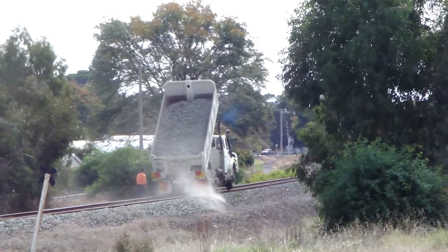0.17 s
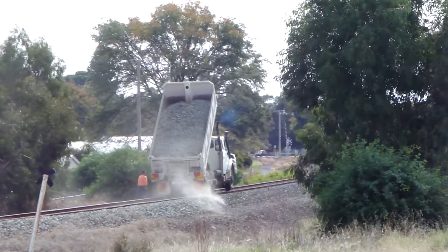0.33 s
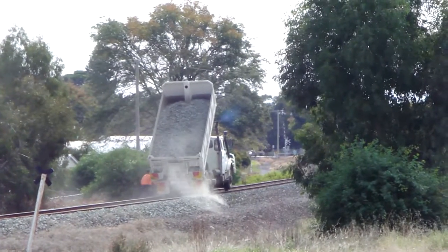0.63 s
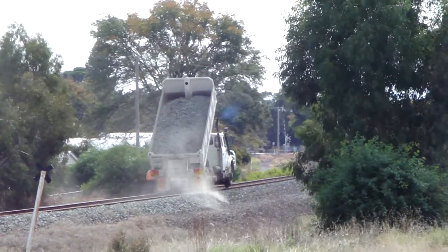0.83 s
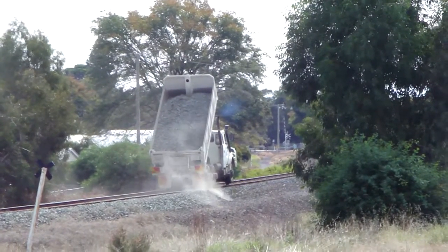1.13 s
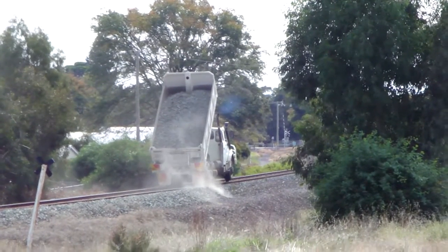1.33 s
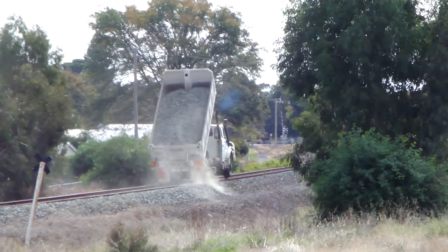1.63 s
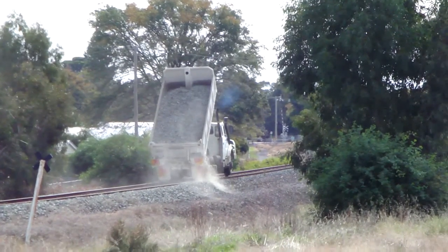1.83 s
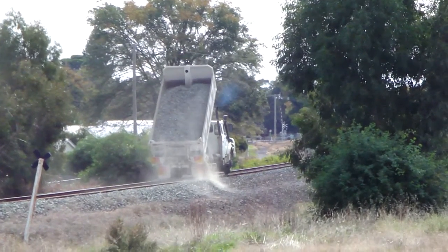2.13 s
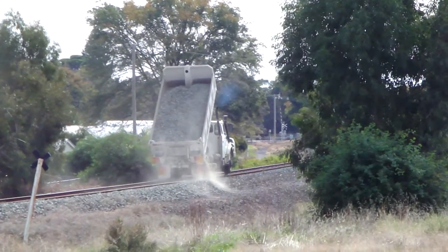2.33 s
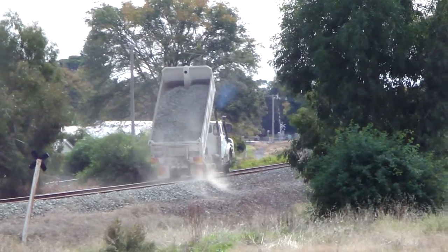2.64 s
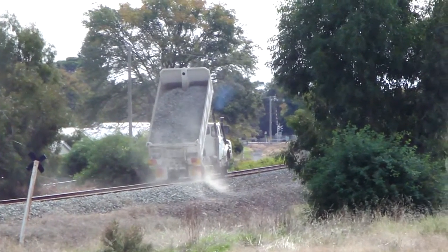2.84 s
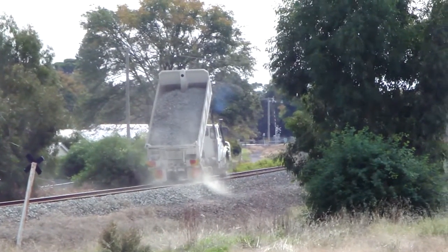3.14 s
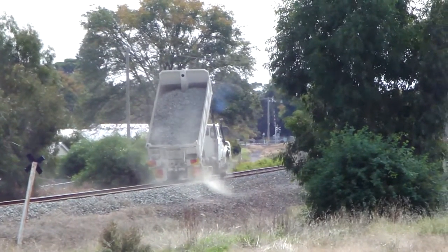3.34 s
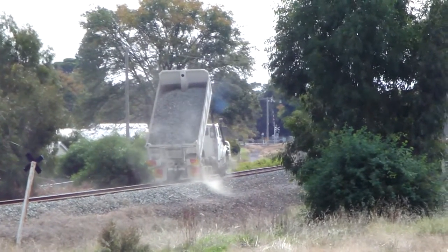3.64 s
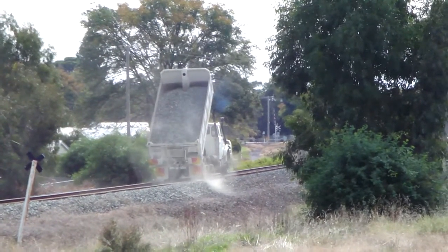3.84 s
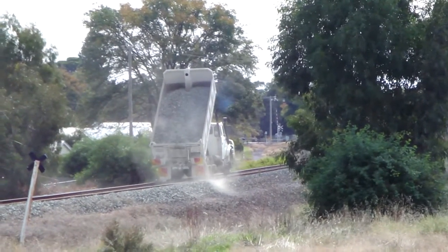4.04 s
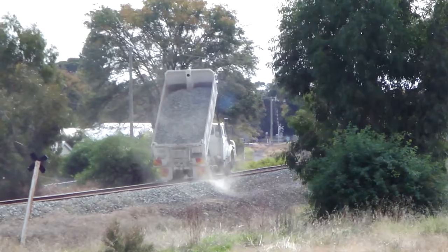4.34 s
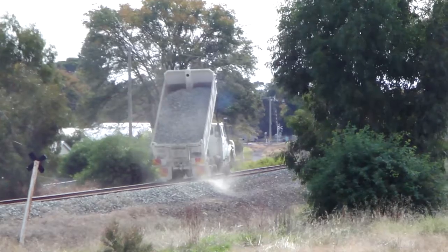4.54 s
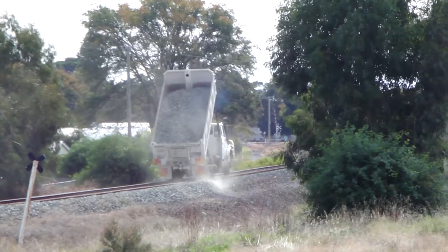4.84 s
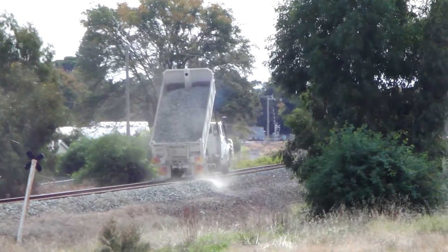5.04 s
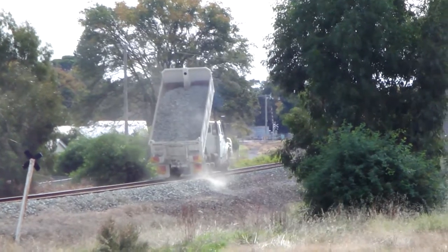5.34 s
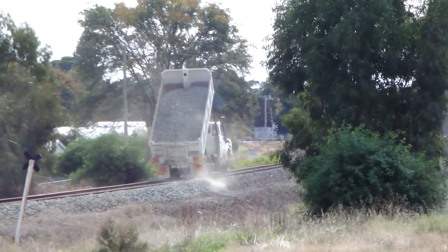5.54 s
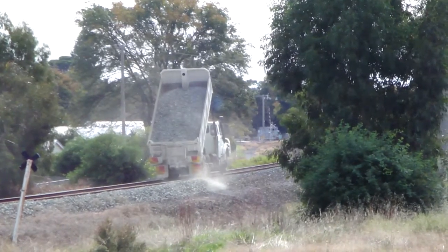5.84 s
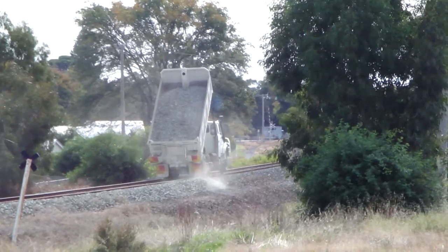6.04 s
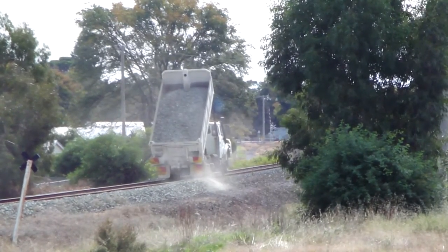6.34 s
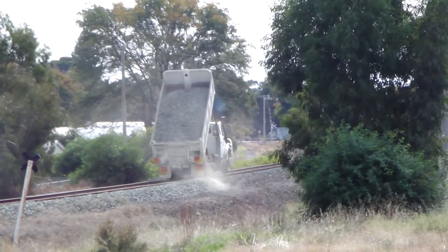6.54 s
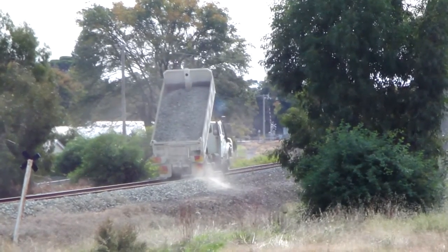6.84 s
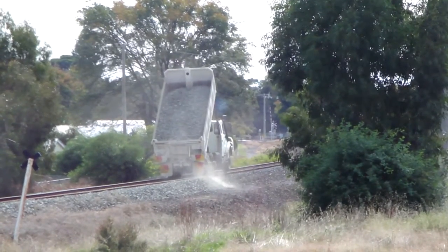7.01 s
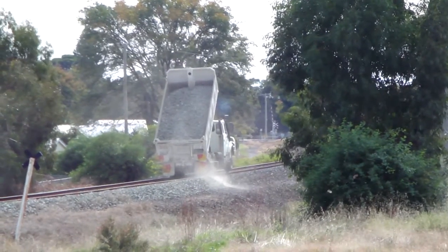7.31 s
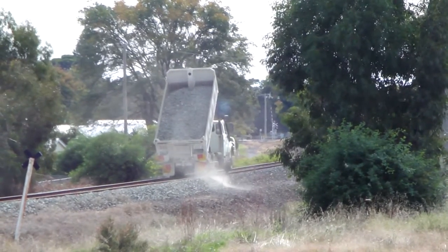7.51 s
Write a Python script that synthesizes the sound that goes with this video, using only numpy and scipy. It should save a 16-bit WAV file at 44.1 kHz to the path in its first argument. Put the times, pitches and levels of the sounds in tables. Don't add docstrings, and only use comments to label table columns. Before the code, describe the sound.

Crushed rock pours from a distant tipping truck in a rushing, clattering hiss, stones knocking, then thins to a gritty trickle over engine hum.

```python
import sys
import numpy as np
from scipy import signal
from scipy.fft import rfft, irfft, next_fast_len
from scipy.io import wavfile
from scipy.ndimage import uniform_filter1d

SR = 44100
rng = np.random.default_rng(int(sys.argv[2]) if len(sys.argv) > 2 else 0)


def generate_wav(sig):
    pcm = np.round(np.clip(np.atleast_2d(sig).T, -1, 1) * 32767).astype(np.int16)
    wavfile.write(sys.argv[1], SR, pcm)


def gain_from_db(level_db):
    decades = np.asarray(level_db, float) / 20
    return 10 ** decades


N = 338247


def evened(x):
    return x / np.sqrt(np.mean(x ** 2) + 1e-20)


def read(points, hz):
    f, value = np.transpose(points)
    return np.interp(np.log(hz + 1), np.log(f + 1), value)


def add(mix, s, sound):
    part = mix[..., round(s * SR):][..., :sound.shape[-1]]
    part += sound[..., :part.shape[-1]]


def filtered(x, response):
    size = next_fast_len(N)
    hz = np.fft.rfftfreq(size, 1 / SR)
    return irfft(rfft(x, size) * response(hz), size)[..., :N]


def left_right(pan_db):
    return np.array([[pan_db], [-pan_db]]) / 2


# time in seconds, level of the firing tone in dB, of the pump in dB, of the fan in dB.
ENGINE_TONES = [(0, -59, -50, -67), (1, -61, -60, -66), (2, -52.5, -55, -71), (3, -55.5, -62, -60),
                (4, -52.5, -60, -59), (4.7, -54.5, -67, -69), (5.3, -64, -57, -53), (6.5, -79, -49.5, -64),
                (7.67, -55, -61, -55)]


def hum():
    tones_hz, pans_db = (121.5, 453, 234), (-9, -14, -6)
    s, *levels = np.transpose(ENGINE_TONES)
    t, out = np.arange(N) / SR, np.zeros((2, N))
    for hz, pan_db, db in zip(tones_hz, pans_db, levels):
        waver = evened(uniform_filter1d(rng.standard_normal(N), size=9000))
        tone = np.sin(2 * np.pi * np.cumsum(hz * (1 + 0.0024 * waver)) / SR)
        level_db = np.interp(t, s, db) - 4 + 0.8 * waver[::-1]
        out += gain_from_db(level_db + left_right(pan_db)) * tone
    return out


# time in seconds, flow in dB, share of fine grit in dB.
STREAM_FLOW = [(0.0, -26.5, 3.5), (0.4, -26, -3.5), (0.72, -23.5, -3), (1.0, -24.5, -4.5), (1.25, -24, -3),
               (2.2, -24.5, -3), (2.5, -23.5, -2), (3.6, -22.5, -4.5), (3.8, -25.5, -3.5), (4.5, -26, -4.5),
               (5.0, -28, -2), (5.7, -30.5, -4), (6.0, -29.5, -5), (6.2, -31.5, -1.5), (6.5, -30.5, 1),
               (6.95, -30.5, -3), (7.2, -29.5, -5), (7.66, -29.5, -0.5)]
# middle in seconds, length in seconds, change of flow in dB, change of grit in dB.
CLUMPS_AND_LULLS = [(0.37, 0.065, 1, 5.5), (0.543, .15, -1.5, 4.5), (0.686, 0.067, 1, 0),
                    (0.95, 0.028, 2.5, 2), (1.047, 0.086, -0.5, 2), (1.225, 0.039, 2, -2),
                    (2.555, 0.036, 3, -4), (2.833, 0.091, 0.5, 0), (3.08, 0.045, 3, -0.5),
                    (3.62, .1, 2, -4), (3.894, 0.064, 2, -2.5), (4.29, .05, 2.5, -1),
                    (4.37, .08, -2.5, 1.5), (5.167, 0.065, 2, -1.5), (5.33, 0.054, -0.5, -1),
                    (5.998, 0.034, -0.5, 3.5), (6.11, .08, -2, -0.5), (6.633, 0.038, 1.5, 2),
                    (6.746, 0.033, 3, -0.5), (7.07, 0.04, 2, 2.5), (7.218, 0.054, 3, 2.5)]


def stream():
    s, *slow = np.transpose(STREAM_FLOW)
    at, length, *bumps = np.transpose(CLUMPS_AND_LULLS)
    t = np.arange(0, N / SR + .01, .005)
    bells = np.exp(-2 * ((t[:, None] - at) / length) ** 2)
    courses = []
    for db, bump in zip(slow, bumps):
        course = np.interp(t, s, db) + bells @ bump
        courses.append(np.interp(np.arange(N) / SR, t, course))
    return courses


# frequency in Hz, level in dB per Hz.
RUMBLE_COLOUR = [(15, -70), (25, -38), (90, -13), (119, -8.5), (228, -1.5), (316, -2.5), (415, -3),
                 (460, 1.5), (756, -5.5), (913, -1), (1120, -6), (1380, -11.5), (1500, -5.5), (1950, -47),
                 (3300, -120)]
# frequency in Hz, likeness from -1 to 1.
RUMBLE_LIKENESS = [(60, 1), (96, -0.029), (150, 0.31), (250, -0.49), (400, -0.56), (640, 0.33),
                   (1030, -0.22), (1660, -1.2), (2660, 0.9), (4270, 0.9), (6860, 0.82), (11000, 0.75)]


def rumble():
    def likeness(hz):
        return np.clip(read(RUMBLE_LIKENESS, hz), -1, 1)

    left, other = rng.standard_normal((2, N))
    right = filtered(left, likeness) + filtered(other, lambda hz: np.sqrt(1 - likeness(hz) ** 2))
    both = filtered(np.array([left, right]), lambda hz: gain_from_db(read(RUMBLE_COLOUR, hz)))
    level_db = -47 + 0.25 * (stream()[0] + 28.5) + 5
    return gain_from_db(level_db) * evened(both)


def rush(channels, surge_db, patch_db):
    frames = N // 64 + 5
    a, b, patch = rng.standard_normal((frames, 129, channels, 3)).T
    patch = uniform_filter1d(patch, size=5, axis=1)
    patch = evened(uniform_filter1d(patch, size=24, axis=2))
    surge = uniform_filter1d(rng.standard_normal((frames, 129)).T, size=200, axis=0)
    quick, slow = [uniform_filter1d(surge, size=size, axis=1) for size in (14, 30)]
    surge = evened(quick + slow * 0.13)
    z = (a + 1j * b) * gain_from_db(surge_db * surge + patch_db * patch)
    return evened(signal.istft(z, nperseg=256, noverlap=192)[1][:, :N])


def flowing(x):
    flow_db, grit_db = stream()
    swell_db, grit_db = flow_db - flow_db.mean(), grit_db - grit_db.mean()
    thud = gain_from_db(-0.43 * swell_db + 0.077 * grit_db)
    upper = gain_from_db(-0.42 * swell_db + 0.059 * grit_db)
    low, mid, high = [filtered(x, lambda hz: 1 / (1 + (hz / edge_hz) ** 8)) for edge_hz in (2050, 3600, 5500)]
    bands = low * thud + (mid - low) + (high - mid) * upper + (x - high) * gain_from_db(grit_db)
    return gain_from_db(flow_db) * bands


# frequency in Hz, level in dB per Hz.
TREE_COLOUR = [(350, -46), (600, 7), (1590, 4.5), (3060, 7.5), (5840, 5), (8020, 6), (10400, -29),
               (11000, -27), (14300, -49), (22000, -120)]


def scatter():
    noise = rush(channels=2, surge_db=-4.3, patch_db=3.0)
    diffuse = filtered(noise, lambda hz: gain_from_db(read(TREE_COLOUR, hz)))
    return flowing(gain_from_db(-9.0) * evened(diffuse))


# start in seconds, level in dB, pitch in Hz, time to fade by 60 dB in seconds.
STEEL_HITS = [
    (1.03, -31, 1136, 0.2),
    (1.53, -23, 1214, 0.074),
    (3.6, -43, 570, .3),
    (3.72, -36.5, 570, 0.35),
    (4.58, -32.5, 1200, 0.23),
]


def clangs():
    out, t = np.zeros(N), np.arange(SR // 2) / SR
    for s, db, hz, t60 in STEEL_HITS:
        rise = np.minimum(t / 0.0023, 1)
        add(out, s, gain_from_db(db - 60 * t / t60) * rise * np.sin(2 * np.pi * hz * t))
    return out


# start in seconds, peak in dB, pitch in Hz, left-right difference in dB.
SPLINTERS = [(0.3471, -19, 9350, 6), (0.4204, -31, 9650, 12), (0.9822, -22, 9200, 3), (1.175, -24, 9000, 6),
             (1.5828, -31, 9080, 1.5), (2.0994, -27, 10200, 1.0), (3.8377, -21.5, 8100, 2),
             (4.0213, -25, 8550, 3), (4.1006, -25, 7440, 0.0), (4.5371, -27, 10600, -1),
             (4.6624, -31, 9900, 1.0), (4.7406, -27, 10500, 3), (4.7894, -31, 10500, 1.5),
             (4.8184, -29, 10200, 1.0), (4.8743, -27, 10400, 1.0), (6.8219, -30, 10500, 13)]


def chips():
    out, t = np.zeros((2, N)), np.arange(1300) / SR
    for (s, db, hz, pan_db), apart in zip(SPLINTERS, rng.uniform(0.0036, 0.011, len(SPLINTERS))):
        pair = np.sin(2 * np.pi * hz * t) + 0.93 * np.sin(2 * np.pi * hz * (1 - apart) * t)
        ring = np.minimum(t / 0.0029, 1) * gain_from_db(-60 * t / 0.063) * pair
        add(out, s, gain_from_db(db - 4.5 + left_right(pan_db)) * ring)
    return out


# start in seconds, peak in dB.
GRIT_PUFFS = [(0.197, -24), (0.3331, -17), (0.3463, -8), (0.3744, -9), (0.426, -2.5), (0.4953, -2.5),
              (0.579, -4), (0.6574, -14), (0.9333, -14), (1.2394, -10), (1.6217, -66), (3.0764, -8),
              (4.356, -14), (5.1754, -13), (5.5234, -13), (5.9923, -10), (6.3966, -10), (6.615, -11),
              (6.6384, -15), (7.063, -19), (7.1, -20), (7.2684, -13), (7.3791, -14), (7.5694, -21),
              (7.5914, -11)]


def spits():
    out, t = np.zeros(N), np.arange(2000) / SR
    puff = np.minimum(t / 0.0016, 1) * np.exp(-t / 0.011)
    for (s, db), grit in zip(GRIT_PUFFS, rng.standard_normal((len(GRIT_PUFFS), 2000))):
        add(out, s, gain_from_db(db - 7.5) * grit * puff)
    return filtered(out, lambda hz: 1 / (1 + (4600 / (hz + 1)) ** 4) / (1 + (hz / 9000) ** 2))


def pebbles(count=40):
    over_flow_db, spread_db, low_hz, high_hz = 9, 2.5, 2300, 4200
    when, size, pitch = rng.random((count, 3)).T
    flow_db = stream()[0][(when * N).astype(int)]
    db = flow_db + over_flow_db + spread_db * (2 * size - 1)
    return list(zip(when * N / SR, db, low_hz * (high_hz / low_hz) ** pitch))


# start in seconds, peak in dB, ring pitch in Hz, crack in dB against the peak.
LARGE_STONES = [(0.2808, -8.5, 3000, -0.5), (0.3476, -4.5, 5270, -6), (0.5322, -5.5, 2420, -18),
                (0.5581, -9, 3720, 0.5), (0.6539, -4, 2560, -8), (0.669, -4, 3180, -10),
                (0.915, -11, 2770, -20), (0.935, -2, 2980, -9), (1.2104, -16, 2760, 2),
                (1.5334, -5.5, 2730, -6), (1.7445, -3, 2870, -13), (1.912, -8, 3230, -11),
                (1.9305, -3, 2570, -11), (2.0803, 0.5, 2840, -16), (2.1705, -5, 2370, -14),
                (2.5611, -5, 2360, -5), (2.7162, -1.5, 2970, -14), (2.7806, -5.5, 2700, -13),
                (2.8595, -2, 2810, -14), (2.8724, 0, 3100, -12), (3.038, -4, 2750, -12),
                (3.0669, -1.5, 2660, -15), (3.078, -2, 2430, -20), (3.5014, 0.5, 2430, -20),
                (5.171, -7, 3180, -2), (5.7882, -9.5, 2840, 1.5), (5.988, -23, 2350, 7),
                (6.048, -13, 2000, -2), (7.0614, -17, 2830, 3.5), (7.1645, -14.5, 2590, 7)]
# start in seconds, peak in dB, ring pitch in Hz.
MIDDLING_STONES = [(0.231, -9.5, 2780), (0.375, -13, 2280), (0.9534, -7, 3290), (1.0974, -6, 2770),
                   (1.489, -11, 2850), (2.537, -7, 2730), (2.8365, -6, 3000), (3.093, -21, 2450),
                   (3.115, -10, 3350), (3.6276, -5, 2770), (3.768, -7.5, 2820), (3.907, -9, 2940),
                   (4.177, -11, 2520), (4.275, -10, 4540), (4.554, -9.5, 3240), (4.6848, -11, 2250),
                   (4.702, -8, 3030), (5.123, -8.5, 2540), (5.4537, -10, 2260), (5.8507, -11, 2010),
                   (6.27, -8.5, 2300), (6.4487, -10.5, 3380), (6.572, -10, 3500), (6.7334, -12, 2750),
                   (7.019, -15, 1900), (7.206, -11, 4400), (7.3662, -14, 2500), (7.512, -9, 2400),
                   (7.551, -8.5, 4900), (7.5946, -7.5, 4550)]


def knocks():
    out, t = np.zeros(N), np.arange(2000) / SR
    upper = signal.butter(3, (1300, 5400), "bandpass", fs=SR)
    tap_crack_db = -8
    stones = LARGE_STONES + [(*row, tap_crack_db) for row in MIDDLING_STONES + pebbles()]
    for (s, db, hz, crack_db), grit in zip(stones, rng.standard_normal((len(stones), 2000))):
        scuffle = grit * np.minimum(t / 0.00018, 1) * np.exp(-t / .0028)
        scuffle[12] += 5.6
        r = np.exp(-np.pi * 900 / SR)
        mode = [1, 0, -0.86], [1, -2 * r * np.cos(2 * np.pi * hz / SR), r * r]
        ring = signal.lfilter(*mode, signal.lfilter(*mode, scuffle))
        crack = signal.lfilter(*upper, scuffle)
        ring, crack = ring / abs(ring).max(), crack / abs(crack).max()
        add(out, s, gain_from_db(db - 10.0) * (ring + gain_from_db(1.24 * crack_db + 7) * crack))
    bounce_s, bounce_db = 0.002184, -5.5
    return filtered(out, lambda hz: 1 + gain_from_db(bounce_db) * np.exp(-2j * np.pi * hz * bounce_s))


def clatter(per_s, spread_db, cycles, count=24):
    size = gain_from_db(spread_db * np.minimum(rng.exponential(1, N), 5))
    size = size * (rng.random(N) < per_s / SR)
    kind, t, out = rng.integers(0, count, N), np.arange(400) / SR, np.zeros(N)
    for k, hz in enumerate(np.linspace(900, 10500, count)):
        ring = np.sin(2 * np.pi * hz * t) * np.exp(-t * np.sqrt(hz * 3000) / cycles)
        out += signal.oaconvolve(size * (kind == k), ring / np.linalg.norm(ring))[:N]
    return evened(out)


# frequency in Hz, level in dB per Hz.
POUR_COLOUR = [(200, -43), (400, -19.5), (700, -19), (1300, -9), (1650, -8), (2150, -3.5), (2900, 0),
               (3600, -2), (5000, -3.5), (6400, -7), (7600, -11.5), (9000, -13.5), (10300, -16),
               (11100, -22.5)]


def pour():
    rock = rush(channels=1, surge_db=1.21, patch_db=0.7)[0] + gain_from_db(-9.5) * clatter(1500, 1.8, 2.94)
    coloured = filtered(rock, lambda hz: gain_from_db(read(POUR_COLOUR, hz)))
    return flowing(gain_from_db(0.5) * evened(coloured))


def ground(x, echo):
    near_s, near_db, far_s, far_db = echo

    def late(hz, s, db):
        return gain_from_db(db) * np.exp(-2j * np.pi * hz * s)

    return filtered(x, lambda hz: 1 + (late(hz, near_s, near_db) + late(hz, far_s, far_db))
                    / (1 + (hz / 4800) ** 4))


# frequency in Hz, left-right difference in dB.
OPENING_LEVEL = [(60, -7), (100, -4.5), (300, -2.5), (640, -3.5), (1030, -1), (2300, 3), (3400, -2),
                 (4500, 0), (6500, -2), (7400, -3.5), (8000, -4), (8700, 7.5), (10000, 1.5), (10900, 0)]
# frequency in Hz, left-right turn in radians.
OPENING_TURN = [(1000, 0.28), (2500, -0.031), (3010, -0.5), (3620, 0.32), (4740, 0.22), (7060, -0.23),
                (8010, 0.82), (9130, 0.63)]


def ports(x):
    sign = np.array([[.5], [-.5]])
    return filtered(x, lambda hz: gain_from_db(sign * read(OPENING_LEVEL, hz))
                    * np.exp(1j * sign * read(OPENING_TURN, hz)))


# near delay in seconds, near level in dB, far delay in seconds, far level in dB.
GROUND_ECHOES = [
    (0.002151, -10.5, .0027, -25.5),
    (0.00211, -14.5, .004, -17.5),
]


def scene():
    rock = pour() + knocks() + spits() + clangs()
    paths = np.array([ground(rock, echo) for echo in GROUND_ECHOES])
    return ports(paths + rumble()) + scatter() + chips() + hum()


def band_limit(x):
    return signal.sosfilt(signal.butter(12, 11340, fs=SR, output="sos"), x)


def record(dry):
    limited = filtered(dry, lambda hz: np.clip((11040 - hz) / 40, 0, 1))
    return band_limit(limited)


dry = scene()
out = record(dry)
generate_wav(out)
```